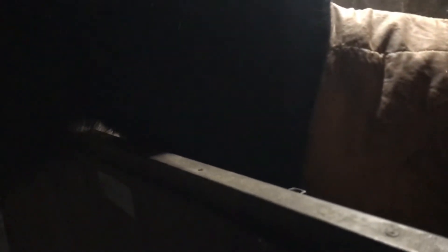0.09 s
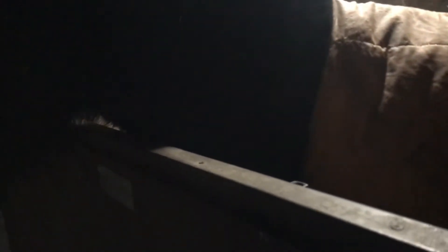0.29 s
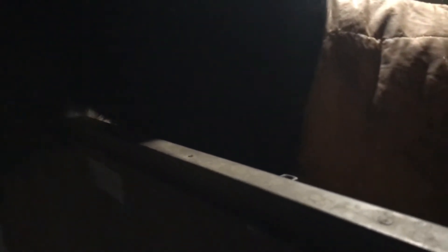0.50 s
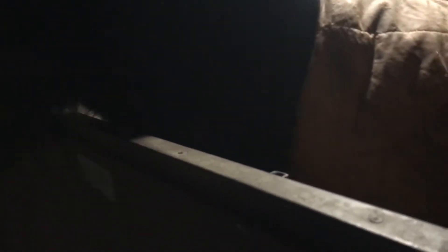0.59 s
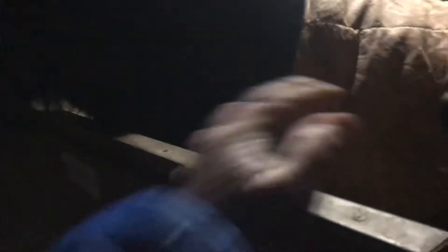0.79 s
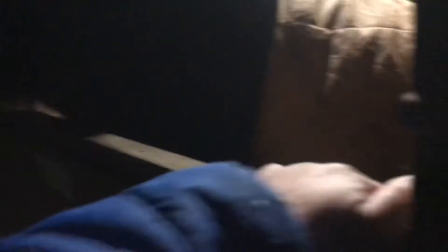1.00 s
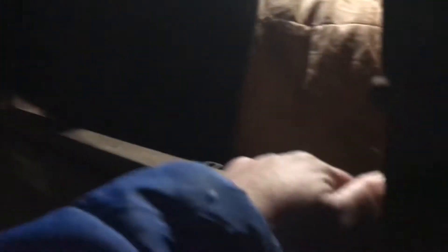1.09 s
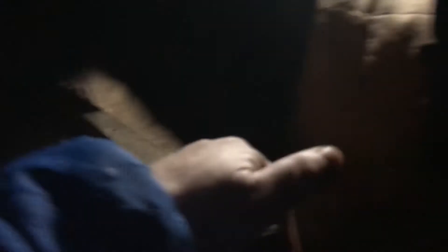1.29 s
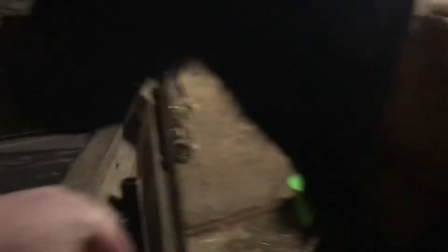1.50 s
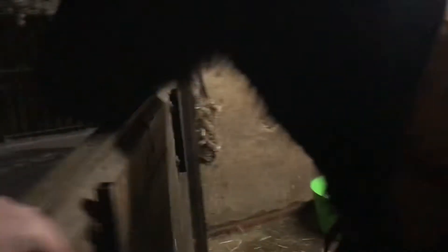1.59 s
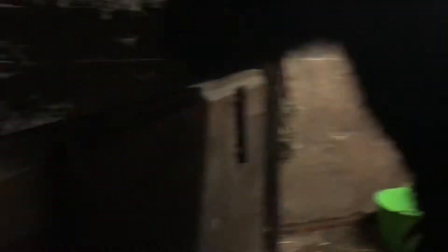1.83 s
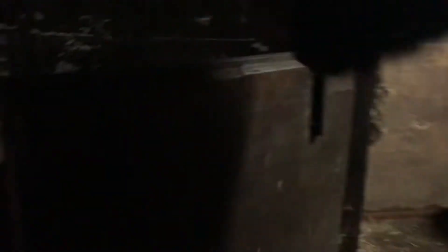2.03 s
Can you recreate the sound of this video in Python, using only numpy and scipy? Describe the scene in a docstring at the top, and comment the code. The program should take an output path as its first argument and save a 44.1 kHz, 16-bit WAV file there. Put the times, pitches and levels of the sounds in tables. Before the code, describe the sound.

A steel latch on a wooden stall door is scraped and knocked free with one very loud crack, then faint scuffs, dry straw snaps and a low door shudder; close handheld microphone in a quiet barn.

```python
"""A steel latch on a wooden stall door is knocked free in sharp clacks: noise and sine bursts ring steel and boards.
The door swings open with a low shudder, a wandering hum under rough board tones; dull thuds sag in pitch.
Scuffs, slides and rubs are bands of grainy noise, some smooth, one a faint narrow hinge rub; straw snaps dryly.
A quiet barn hisses and rumbles underneath; the stall answers the latch with a diffuse echo."""
import sys
import numpy as np
from scipy import signal
from scipy.fft import rfft, irfft
from scipy.io import wavfile

SR = 44100
rng = np.random.default_rng(int(sys.argv[2]) if len(sys.argv) > 2 else 0)


def transcribe(u):
    """Save the signal u as a 16-bit wav file named by the first command-line argument.

    u: samples, shape (n,) or (channels, n), limited to [-1, 1]; the rate is SR.
    q: integer samples, one column per channel.
    """
    v = np.clip(np.atleast_2d(u).T, -1, 1)
    q = np.round(v * 32767).astype(np.int16)
    wavfile.write(sys.argv[1], SR, q)


N = 92610
T = np.arange(N) / SR  # s

# latch blows: (time [s], level [dB], clack centre [Hz], clack length [s], then relative to the blow:
# bright snap [dB], woody knock [dB], steel ring [dB], door boom [dB])
LATCH_BLOWS = [(0.2211, -17, 3770, 0.0054, -9, -6, -25.5, -31),
               (0.2249, -26, 1083, 0.0049, -40, 1.5, -59, -9.5),
               (0.247, -38.5, 8480, 0.0088, -18, -1, -35, -50),
               (0.32, -47.5, 3020, 0.0014, -28, 2, -53.5, -60),
               (0.3362, -16, 2500, 0.0012, -16, -4, -40.5, -45),
               (0.3554, -14.5, 3800, 0.0016, -14, -4.5, -33, -22),
               (0.365, 0.97, 3730, 0.0029, -10.5, -21.5, -19, -27.5),
               (0.37, -13.5, 1020, 0.0017, -7, -7.5, -19, -11.5),
               (0.59, -38.5, 1810, 0.0043, -21, -7.5, -29.5, -27),
               (0.596, -42.5, 946, 0.0069, -19.5, -33, -33.5, -11.5),
               (.614, -36, 8870, 0.0026, -9.5, -9.5, -35.5, -41.5),
               (0.627, -48, 8840, 0.001, -5, -3.5, -45.5, -9.5),
               (0.9745, -31.5, 2060, 0.0026, -23.5, -3, -58, -13),
               (0.9776, -32.5, 700, 0.0047, -20, -9.5, -48.5, -13),
               (1.07, -42.5, 12000, .002, -7, -10.5, -26.5, -30),
               (1.261, -48.5, 2320, 0.0072, -5, -11, -44.5, -31),
               (1.498, -47.5, 1800, 0.003, -11.5, -8, -45.5, -8.5),
               (2.047, -43.5, 2790, 0.005, -4, -12, -28, -1.5)]
CLACK_Q, SNAP_T60_S = 4, .03
KNOCK_HZ, KNOCK_OCTAVES, KNOCK_T60_S = 1030, 2.7, .044

# ringing modes of the steel bolt: (frequency [Hz])
STEEL_MODE_HZ = [2850, 3865, 5590, 5696, 7122, 8425, 10300, 11920, 12900, 15300, 15550]
# how each steel mode rings: (level [dB], decay t60 [s], width of its rattle [Hz])
STEEL_MODES = [(3, .07, 200), (-15, .3, 700), (-3, .3, 60), (-10, .3, 60), (-5, .15, 140), (-15, .2, 200),
               (-3, .2, 200), (-4, .12, 250), (-11, .1, 200), (-22, .1, 100), (-12, .12, 60)]
RATTLE_S, RING_ON_DB = .011, -20
ROUGH_RING_HZ = 400  # modes this wide ring as pure noise

# modes of the door boards: (frequency [Hz])
DOOR_MODE_HZ = [73.5, 147, 185, 210, 280, 347, 440, 624, 960, 1040, 1290]
# how each board mode booms: (level [dB], decay t60 [s])
DOOR_MODES = [(-24, .3), (-20, .2), (-12, .15), (-7, .3), (-9, .12), (-1, .16), (-1, .08), (4, .06),
              (3, .06), (-4, .08), (1, .045)]
DOOR_SWELL_S, DOOR_SWELL_HZ = .01, 210  # swell time at this frequency; higher modes swell faster
DOOR_ROUGH, DOOR_WIDTH_HZ = .45, 60

# shudder of the swinging door: (time [s], lowest mode level [dB rms], higher modes level [dB rms])
SHUDDER_LEVELS = [(1.29, -74, -67.5), (1.318, -54.5, -49), (1.34, -40.5, -41.5), (1.374, -46.5, -47.5),
                  (1.433, -37, -43.5), (1.5, -49.5, -44.5), (1.533, -40, -51), (1.57, -36, -39),
                  (1.592, -34, -50), (1.634, -51, -49.5), (1.658, -45.5, -48.5), (1.74, -44.5, -71),
                  (1.777, -50.5, -64.5), (1.812, -50, -61.5), (1.848, -72, -57), (1.87, -50.5, -52)]
# balance of the board modes above the lowest within the shudder: (level [dB])
SHUDDER_MODE_DB = [2, -8, 0.5, -12, -6.5, -16]
SHUDDER_WIDTH_HZ, WANDER_HZ = 47.1, 9.7  # width of each higher mode, rms pitch wander of the lowest

# dull thuds: (time [s], level [dB], pitch scale [Hz])
THUD_HITS = [(.05, -55, 180), (1.218, -54, 250), (1.862, -50, 350), (1.883, -32, 85), (1.93, -44, 100)]

# scuffs, slides and rubs: (time [s], attack [s], hold [s], release t60 [s], level [dB rms before shaping],
# centre [Hz], width [octaves], grain depth [dB], limited to 4)
SCUFF_MOVES = [(0.184, 0.027, 0.21, 0.17, -47.5, 795, 2.04, -5),
               (0.382, 0.017, 0.039, 0.36, -46, 1180, 2.6, -21),
               (0.386, 0.018, 0.017, 0.14, -53.5, 6983, 1.9, 8),
               (0.547, 0.04, 0.035, 0.89, -61.5, 3140, 3, 6),
               (0.675, 0.05, 0.29, 0.34, -62.5, 1237, 0.13, -7), (.7, 0.13, 0.1, 0.39, -62, 481, 6.4, 8.5),
               (0.985, 0.039, 0.081, 0.13, -56, 3300, 0.63, 1.5),
               (0.981, .02, 0.097, 0.14, -58, 1300, 1.4, 1),
               (1.013, 0.04, 0.037, .08, -65.5, 11500, 0.85, 3),
               (1.214, 0.0066, 0.0062, 0.042, -59, 646, 2, -4),
               (1.229, 0.03, 0.011, 0.075, -60, 2927, 1.08, 2),
               (1.327, 0.064, 0.019, 0.25, -53, 820, 0.98, 3.5),
               (1.448, 0.021, 0.15, 0.16, -65.5, 908, 1.13, -1.2),
               (1.6376, 0.0014, 0.017, 0.19, -57, 11250, 0.86, 1.8),
               (1.6385, .002, 0.041, 0.13, -56.5, 4000, 1.4, 3),
               (1.641, 0.02, 0.022, 0.12, -55, 1100, 0.72, -0.5),
               (1.681, .02, 0.031, .06, -62, 3450, 2.9, 0), (1.824, 0.019, 0.007, 0.28, -56, 905, 1.3, 3),
               (1.841, 0.021, 0.094, 0.088, -58, 317, 0.46, 3.5),
               (2.023, 0.015, 0.044, 0.34, -50.5, 860, 2.45, 1.5),
               (2.029, 0.02, 0.012, 0.17, -53, 9080, 1.5, 2.5)]

# straw snapping: (time [s], level [dB])
STRAW_CRACKS = [(1.0343, -51), (1.0463, -45), (1.051, -49), (1.059, -40.5), (1.096, -42), (1.6412, -42.5),
                (2.0295, -47.5), (2.052, -42), (2.054, -45)]
CRACK_HZ, CRACK_OCTAVES, CRACK_S = 3200, .83, .0009

# low rumble of movement: (time [s], level [dB rms])
RUMBLE_LEVELS = [(0, -78), (.18, -75), (.28, -47), (.35, -52), (.43, -48), (.55, -57), (.78, -70.5),
                 (.95, -48.5), (1.05, -59), (1.15, -69), (1.28, -100), (1.45, -45.5), (1.65, -54.5),
                 (1.85, -63), (1.95, -57), (2.1, -82)]
RUMBLE_HZ, RUMBLE_OCTAVES = 65, 1.7

# colour of the barn hiss: (frequency [Hz], relative level per Hz [dB])
HISS_COLOUR = [(18, -18), (30, 3.5), (53, -14.5), (184, 1.5), (437, -7.5), (1390, -12), (4780, -22.5),
               (8740, -26), (16000, -26.5)]
# barn hiss over time, relative to HISS_DB: (time [s], level [dB])
HISS_LEVELS = [(.17, -4.6), (.25, 15.5), (.45, 1.5), (.53, 5.5), (.62, 2), (.85, 9), (.89, 3), (1.2, 3),
               (1.5, 3.5), (1.62, 3.5), (1.8, 1.5), (2.1, 6.5)]
HISS_DB = -61.5

# echo of the stall: (band centre [Hz], level [dB], decay t60 [s])
STALL_BANDS = [(300, -56, 0.29), (700, -45, 0.16), (1402, -48, 0.24), (3000, -62, 0.4), (6000, -57, .18),
               (12000, -61, 0.085)]

MIC_DIP_HZ, MIC_DIP_SHARE = 10600, .35
CLIP_LEVEL, TOP_HZ = .93, 15900


def undb(db):
    """Turn decibels into gain."""
    return 10 ** (np.asarray(db) / 20)


def unit(x):
    """Scale to an rms of 1."""
    return x / np.sqrt(np.mean(x ** 2))


def fade(t, t60):
    """Exponential decay that falls 60 dB in t60 seconds."""
    return np.exp(-np.log(1000) * t / t60)


def curve(rows):
    """Join (time, value) rows with straight lines."""
    return np.interp(T, *np.array(rows).T)


def band(x, hz, octaves):
    """Band-pass so many octaves wide, within the audible range."""
    edges = np.clip(hz * 2. ** (np.array([-.5, .5]) * octaves), 15, .49 * SR)
    return signal.sosfilt(signal.butter(2, edges, "band", fs=SR, output="sos"), x)


def narrow(count, hz, width_hz):
    """Noise gathered round one frequency: a rough tone of rms 1."""
    settle = 4000  # samples dropped while the filter builds up
    noise = rng.standard_normal(count + settle)
    return unit(band(noise, hz, np.log2(1 + width_hz / hz))[settle:])


def add(out, start_s, x):
    """Mix a sound in at its start time, trimmed at the end of the scene."""
    i = int(start_s * SR)
    out[i:i + len(x)] += x[:N - i]


def steel_bolt(t):
    """The bolt's modes rattle loudly until it seats, then ring on softly; wider modes are noisier."""
    envelope = np.exp(-(t / RATTLE_S) ** 4) + undb(RING_ON_DB)
    steel = np.zeros(len(t))
    for hz, (db, t60, width_hz) in zip(STEEL_MODE_HZ, STEEL_MODES):
        rough = narrow(len(t), hz, width_hz)
        pure = np.sqrt(2) * np.sin(2 * np.pi * hz * t)
        share = min(width_hz / ROUGH_RING_HZ, 1)
        ring = share * rough + (1 - share) * pure
        steel += undb(db) * fade(t, t60) * envelope * ring
    return steel


def door_boards(t):
    """The boards' modes boom a little late, each a sine roughened with narrow noise."""
    door = np.zeros(len(t))
    for hz, (db, t60) in zip(DOOR_MODE_HZ, DOOR_MODES):
        tone = np.sin(2 * np.pi * hz * t) + DOOR_ROUGH * narrow(len(t), hz, DOOR_WIDTH_HZ)
        swell = 1 - np.exp(-t * hz / DOOR_SWELL_HZ / DOOR_SWELL_S)
        door += undb(db) * tone * fade(t, t60) * swell
    return door


def latch():
    """Each blow stacks a clack, a bright snap and a woody knock on the ringing bolt and booming boards."""
    out, t = np.zeros(N), T[:SR // 3]
    onset = np.minimum(t / .0005, 1)
    for start, db, hz, length, snap_db, knock_db, steel_db, door_db in LATCH_BLOWS:
        noise = rng.standard_normal((3, len(t)))
        clack = .3 * unit(band(noise[0], hz, 1 / CLACK_Q)) + .7 * np.sin(2 * np.pi * hz * t)
        clack = clack * np.exp(-(t / length) ** 2)
        snap = undb(snap_db) * band(noise[1], 5500, 2.8) * fade(t, SNAP_T60_S)
        knock = undb(knock_db) * unit(band(noise[2], KNOCK_HZ, KNOCK_OCTAVES)) * fade(t, KNOCK_T60_S)
        steel = undb(steel_db) * steel_bolt(t)
        door = undb(door_db) * door_boards(t)
        add(out, start, undb(db) * (onset * (clack + snap + knock + steel) + door))
    return out


def shudder():
    """Hinge friction keeps the lowest board mode humming and shakes the next ones roughly."""
    time, low_db, high_db = np.array(SHUDDER_LEVELS).T
    on = np.clip(np.minimum(T - time[0], time[-1] - T) / .0077, 0, 1)  # ramps in and out
    wander = unit(band(rng.standard_normal(N), 17.3, .64))
    hum_hz = DOOR_MODE_HZ[0] + WANDER_HZ * wander
    hum = np.sqrt(2) * np.sin(2 * np.pi * np.cumsum(hum_hz) / SR)
    shake = np.zeros(N)
    for hz, db in zip(DOOR_MODE_HZ[1:], SHUDDER_MODE_DB):
        shake += undb(db) * narrow(N, hz, SHUDDER_WIDTH_HZ)
    low = hum * undb(np.interp(T, time, low_db))
    high = unit(shake) * undb(np.interp(T, time, high_db))
    return on * (low + high)


def thuds():
    """A soft push of about two cycles that sags in pitch."""
    out, t = np.zeros(N), T[:SR // 8]
    for start, db, hz in THUD_HITS:
        turns = hz * t
        push = -1.6 * np.sin(2 * np.pi * 2.36 * turns ** .33)  # phase slows as it goes
        envelope = np.minimum(turns / .5, 1) * np.exp(-turns / 1.8)
        add(out, start, undb(db) * push * envelope)
    return out


def scuffs():
    """Scuffs, slides and rubs: bands of grainy noise, some smooth, one a faint narrow hinge rub."""
    out, grain = np.zeros(N), 60  # samples per grain
    for start, attack, hold, t60, db, hz, octaves, grain_db in SCUFF_MOVES:
        size = np.minimum(rng.exponential(size=N // grain + 1), 3)
        grain_level_db = np.minimum(grain_db, 4) * np.repeat(size, grain)[:N]
        grains = rng.standard_normal(N) * undb(grain_level_db)
        rise = np.clip((T - start) / attack, 0, 1) ** 1.9
        release = fade(np.maximum(T - start - attack - hold, 0), t60)
        out += undb(db) * rise * release * unit(band(grains, hz, octaves))
    return out


def straw_cracks():
    """Straw snaps: single dry bursts of band noise, a few cycles long."""
    out, t = np.zeros(N), T[:400]
    for start, db in STRAW_CRACKS:
        snap = unit(band(rng.standard_normal(len(t)), CRACK_HZ, CRACK_OCTAVES))
        add(out, start, undb(db) * snap * np.exp(-t / CRACK_S))
    return out


def stall_echo(x):
    """Diffuse echo off the stall: noise tails that fade band by band, convolved with the sound."""
    t = T[:SR * 3 // 4]
    tail = np.zeros(len(t))
    for hz, db, t60 in STALL_BANDS:
        tail += undb(db) * unit(band(rng.standard_normal(len(t)), hz, 1.5)) * fade(t, t60)
    return signal.fftconvolve(x, tail * np.minimum(t / .0043, 1))[:N]


def rumble():
    """Low movement, heard as deep band noise that swells and sinks."""
    noise = rng.standard_normal(N)
    return unit(band(noise, RUMBLE_HZ, RUMBLE_OCTAVES)) * undb(curve(RUMBLE_LEVELS))


def barn_hiss():
    """Quiet barn air: noise coloured in the spectrum, its level moving over time."""
    hz = np.maximum(np.fft.rfftfreq(N, 1 / SR), 1)
    colour_hz, colour_db = np.array(HISS_COLOUR).T
    colour = undb(np.interp(np.log(hz), np.log(colour_hz), colour_db))
    hiss = irfft(rfft(rng.standard_normal(N)) * colour, N)
    return unit(hiss) * undb(HISS_DB + curve(HISS_LEVELS))


def scene():
    """Mix every layer into one channel; only the latch feeds the echo."""
    blows = latch()
    door = blows + stall_echo(blows) + shudder()
    movement = thuds() + scuffs() + straw_cracks()
    background = rumble() + barn_hiss()
    return (door + movement + background)[None]


def record(dry):
    """The microphone dips in the high treble; the recorder drops deep bass, clips peaks and cuts the top."""
    peak = signal.lfilter(*signal.iirpeak(MIC_DIP_HZ, 9, fs=SR), dry)
    dipped = dry - MIC_DIP_SHARE * peak
    lean = signal.sosfilt(signal.butter(2, 40, "high", fs=SR, output="sos"), dipped)
    clipped = np.clip(lean, -CLIP_LEVEL, CLIP_LEVEL)
    return signal.sosfilt(signal.ellip(10, .2, 60, TOP_HZ, fs=SR, output="sos"), clipped)


dry = scene()
out = record(dry)
transcribe(out)
```